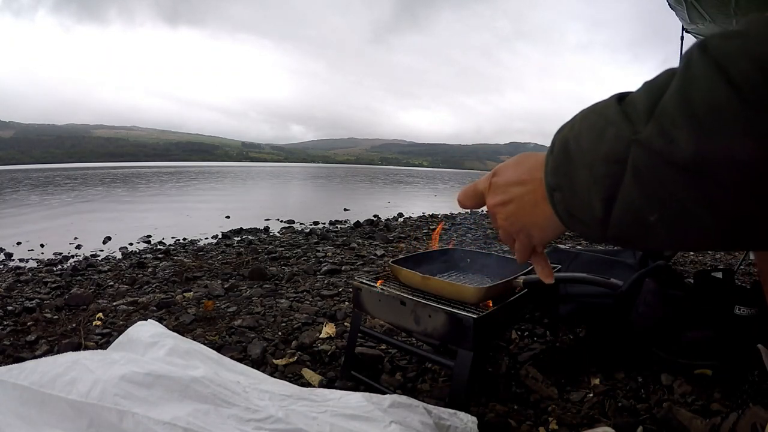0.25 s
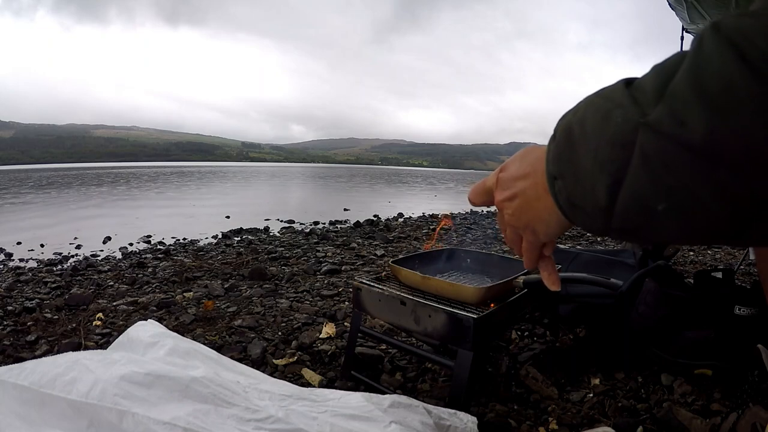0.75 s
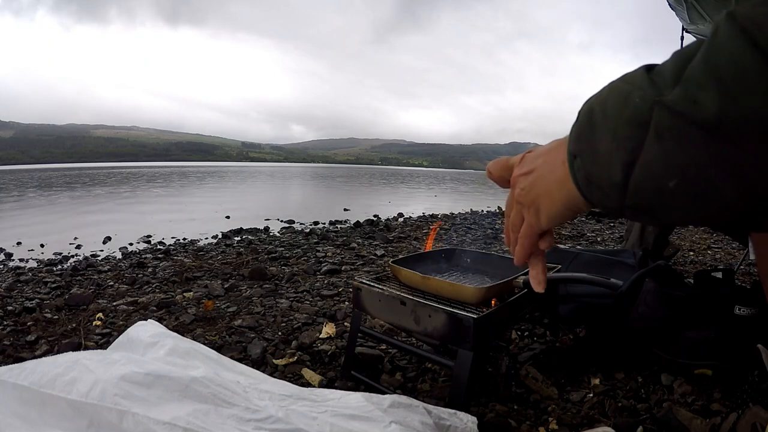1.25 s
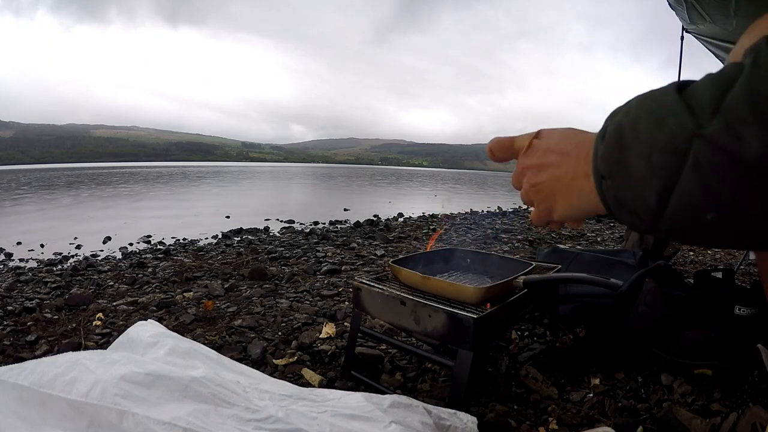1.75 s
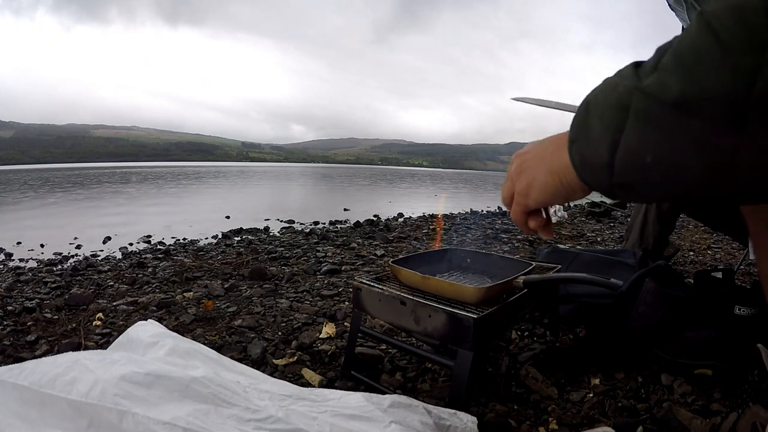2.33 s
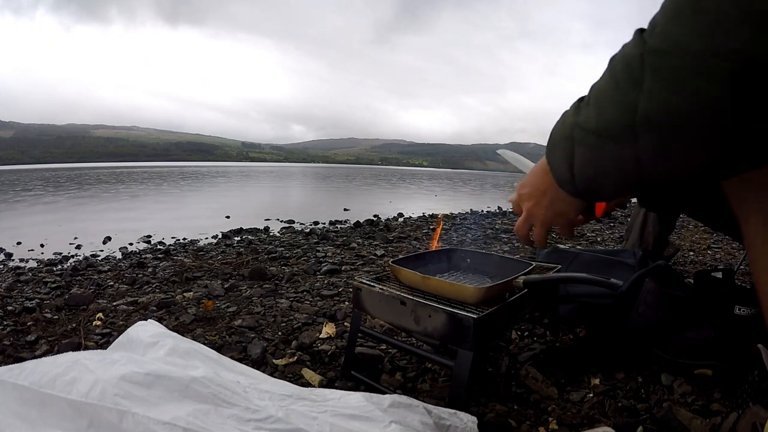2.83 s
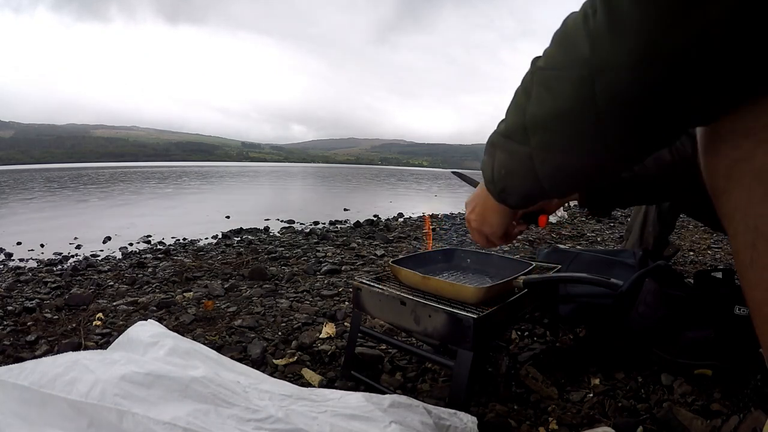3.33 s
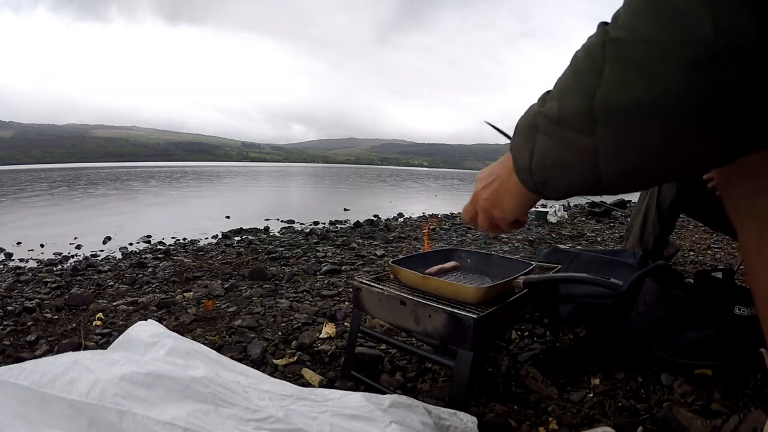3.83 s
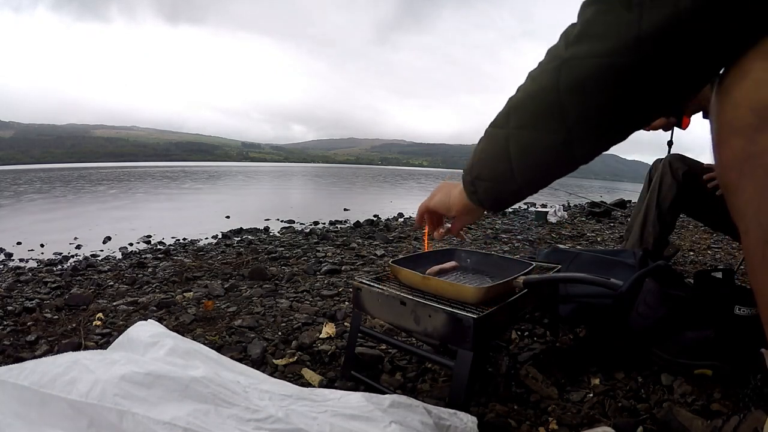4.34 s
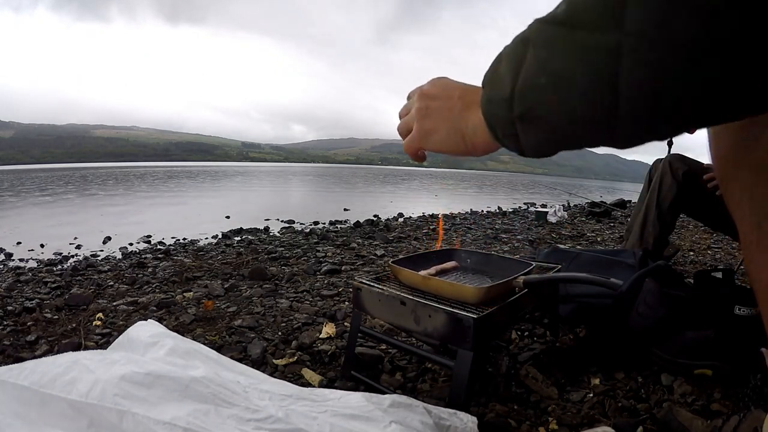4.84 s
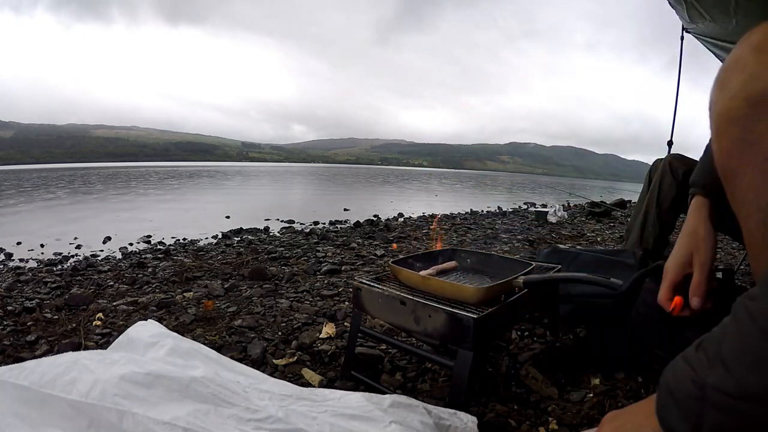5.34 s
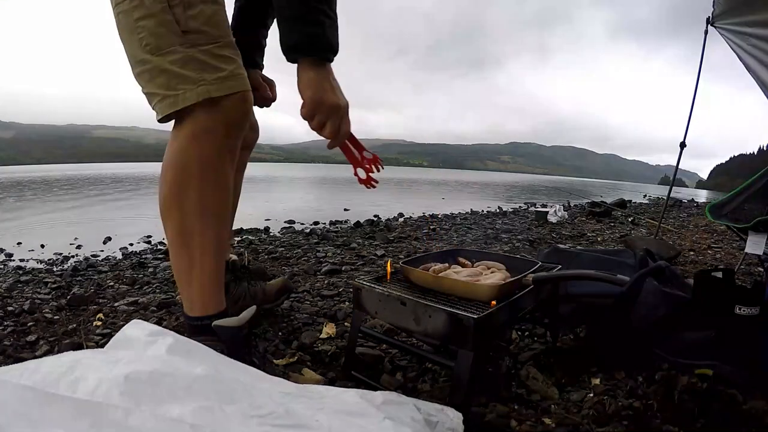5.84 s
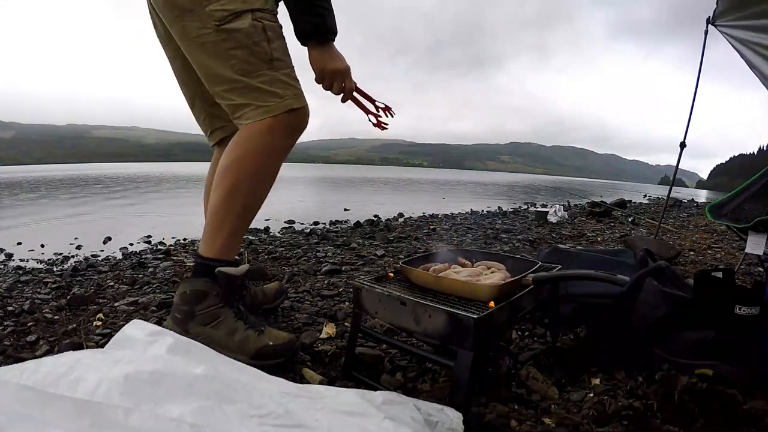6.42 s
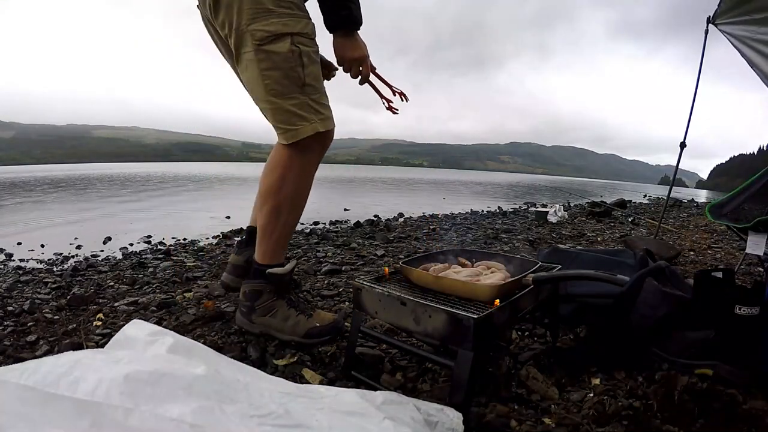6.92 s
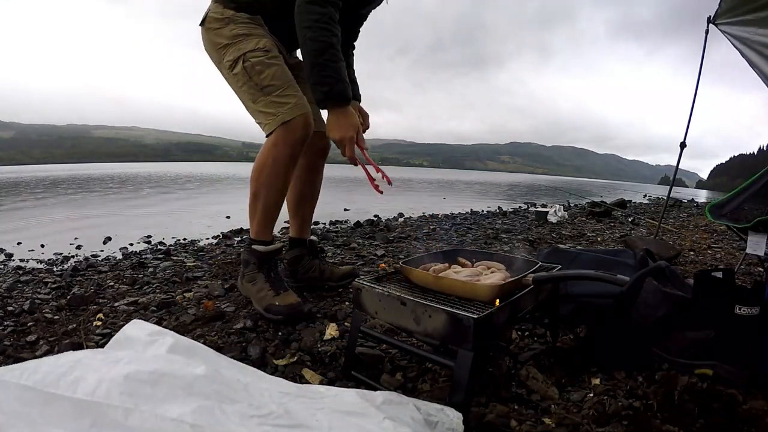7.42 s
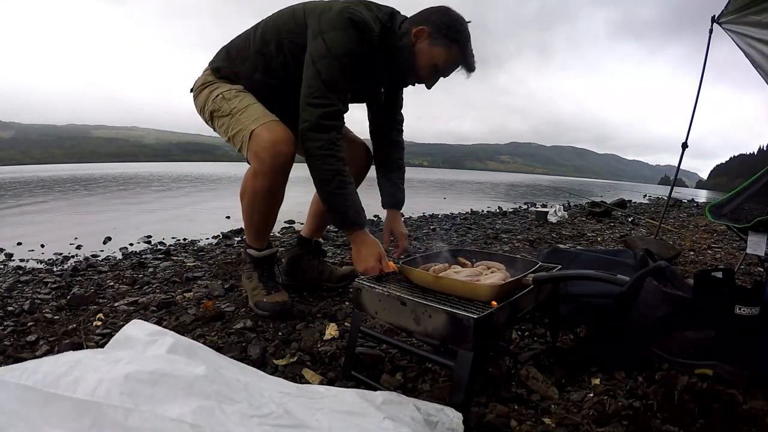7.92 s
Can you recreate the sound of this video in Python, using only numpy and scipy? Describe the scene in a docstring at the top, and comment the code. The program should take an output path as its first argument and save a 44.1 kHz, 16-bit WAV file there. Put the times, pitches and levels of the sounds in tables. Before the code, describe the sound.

Hot fat spits sharp cracks and ringing plops over thin crackle, a metal clank, then a full pan sizzles densely while boots shift on stones.

```python
"""Sausages fry in a pan on a wood-fired stove on a pebbly lake shore: ringing plops and noise cracks.
The nearly empty pan spits in thin crackle, then the full pan sizzles densely; both are shaped random clicks.
Metal clanks (band noise, stove modes); boots on the stones and soft bumps knock (sinking tones, grit).
Soles scuff (lumpy band noise), breeze and flames (coloured noise) rumble below, with a faint low drone
(narrow-band noise)."""
import sys
import numpy as np
from scipy import signal
from scipy.fft import rfft, irfft
from scipy.io import wavfile

SR = 44100
rng = np.random.default_rng(int(sys.argv[2]) if len(sys.argv) > 2 else 0)


def output_pcm(signal):
    """Save a mono or channel-first signal as 16-bit PCM at the path in sys.argv[1].

    Samples are clipped to [-1, 1] before scaling.
    """
    pcm = np.clip(np.atleast_2d(signal).T, -1, 1) * 32767
    wavfile.write(sys.argv[1], SR, np.round(pcm).astype(np.int16))


N = 360297
FULL_PAN_S = 5.62


def pops(bursts, plop_db=-1.0, crack_db=0.7, crack_s=0.00062, spatter_db=-13, spatter_s=0.0055,
         torn_cycles=0.66, whole_cycles=1.5, slap_db=-8, echo_s=0.0026, echo_db=-8):
    """Each burst is the plop of a cavity and the crack of a tearing film, then a spatter of droplets."""
    plops, cracks = np.zeros(N), np.zeros(N)
    t = np.arange(SR // 40) / SR
    for (s, hz, ring_db, tick_db), (delay, detune) in zip(bursts, rng.random((len(bursts), 2))):
        # a cavity that tears open violently hardly rings at all
        cycles = np.interp(tick_db - ring_db, [-8, 6], [whole_cycles, torn_cycles])
        first = plop(t, hz, cycles=cycles, linger_cycles=7 * cycles)
        add(plops, s, from_db(ring_db + plop_db) / np.sqrt(cycles) * first)
        # a fainter, slightly detuned plop follows a moment later
        second = plop(t, hz * (0.73 + 0.56 * detune), cycles=cycles, linger_cycles=5 * cycles)
        add(plops, s + 0.00103 + 0.004 * delay, from_db(ring_db + plop_db + slap_db) * second)

        spatter = from_db(spatter_db) * burst(t, spatter_s)
        crack = from_db(tick_db + crack_db) * (burst(t, crack_s) + spatter)
        add(cracks, s, crack)
        # the pan wall echoes it, sooner or later by its place in the pan
        add(cracks, s + echo_s * (0.5 + delay), from_db(echo_db) * crack)
    return plops + small_source(cracks)


def small_source(cracks, body_db=-3, bass_db=-14):
    """Small sources radiate little bass."""
    full_bodied = cracks + from_db(body_db) * cut(cracks, 10300, "low", order=1)
    bass = from_db(bass_db) * cut(cracks, 700, "low", order=1)
    radiated = cut(full_bodied, 3000, "high", order=1) + bass
    return cut(cut(radiated, 104, "high"), 7600, "low", order=1)


def plop(t, hz, cycles=1.13, rise=0.0061, linger_db=-14, linger_cycles=10):
    """A steam cavity swells, rings on for some cycles and rises in pitch as it opens."""
    turns = hz * t
    age = turns / cycles
    main = age * np.exp(1 - age)
    linger = from_db(linger_db) * (1 - np.exp(-age)) * np.exp(-turns / linger_cycles)
    return (main + linger) * np.sin(2 * np.pi * turns * (1 + rise * np.minimum(age, 6)))


def loud_pops():
    """The loudest bursts in the fat, as rows for pops()."""
    # (time [s], cavity pitch [Hz], relative plop level [dB], relative crack level [dB])
    loud_rows = [(.2435, 3200, -12.5, -9), (.3724, 3000, -14, -11), (.406, 3450, -8.5, -33),
                 (.5417, 3900, -13, -27), (.5714, 4050, -23, -6.5), (.6088, 4500, -21, -6.5),
                 (.651, 7400, -10.5, -3.5), (.7492, 4340, -26, -2), (.813, 1800, -23, -30),
                 (.8978, 3460, -15, -34), (.9541, 3180, -24, -6.5), (1.0652, 3020, -10.5, -15),
                 (1.1784, 3700, 2, 13.5), (1.1935, 4770, -11.5, -2), (1.271, 4100, -21, -5.5),
                 (1.328, 5600, -20, -7), (1.3502, 2290, -10.5, -14.5), (1.5288, 5000, -23, -7),
                 (1.5419, 4170, -13.5, -2), (1.6723, 3860, -19, -9), (1.7276, 3700, -15, -26),
                 (1.8229, 5300, -4, 3.5), (1.9661, 4870, -20.5, -8), (2.0387, 4540, -32, -8.5),
                 (2.1303, 3470, -14, -23), (2.1578, 3230, -10, -10), (2.23, 3120, -16.5, -11.5),
                 (2.2515, 3450, -13, -17), (2.2755, 2680, -18.5, -33), (2.3174, 4500, -20, -3),
                 (2.4306, 5900, -32, -10), (2.4932, 4200, -24, -4), (2.5802, 2900, -17, -34),
                 (2.6541, 5900, -20, -3.5), (2.7244, 2940, -15.5, -34), (2.8564, 3570, -13.5, -19),
                 (2.8677, 4150, -15.5, -1), (2.8817, 3830, -16.5, -27), (2.9478, 2330, -22.5, -7),
                 (3.0548, 3610, 3, 8), (3.1029, 4650, -25, -1.5), (3.2725, 2800, -19.5, -28),
                 (3.3871, 2390, -14, -14.5), (3.4437, 3120, -26, -7), (3.4934, 4260, -4.5, 6),
                 (3.5515, 3610, -18, -7), (3.6677, 6800, -10, 10.5), (3.738, 3780, -18, -10),
                 (3.874, 3830, -16.5, -8.5), (4.0306, 3820, -7, 13), (4.1015, 2850, -11, -17),
                 (4.191, 4250, -18, -2.5), (4.4332, 4640, -28, -4.5), (4.468, 4200, -16.5, -11),
                 (4.5241, 5270, -17, -1), (4.607, 3160, -11, -13), (4.8034, 3340, -10.5, -15),
                 (4.8515, 2700, -13.5, -25), (4.868, 6500, -22, -2.5), (4.8965, 3080, -23, -2.5),
                 (4.9553, 2950, -10.5, 0), (5.1511, 3730, -27, -4), (5.2562, 2190, -16.5, -16),
                 (5.2772, 3450, -8, -16), (5.376, 2050, -8.5, -7), (5.3997, 4330, -15.5, -18),
                 (5.5371, 3330, -20, -29), (5.6193, 4170, -16, -7.5), (5.6422, 3190, -15.5, -25),
                 (5.6897, 3420, -18.5, -27), (5.7829, 2900, -18.5, -6), (5.9887, 2340, -17.5, -29),
                 (6.2985, 3150, -8.5, 1.5), (6.3597, 3320, -19, -24), (6.9657, 3420, -20, -30),
                 (7.2627, 1860, -25, -16), (7.562, 3600, -18, -10), (7.7898, 3770, -18.5, -9),
                 (7.8798, 2580, -19, -26)]
    return list(loud_rows)


def lesser_pops(count=160, per_s=14, smothered_db=-5.5):
    """Lesser bursts, one at a random moment in each 1/per_s; a full pan muffles their cracks."""
    # (mean, spread) of pitch [Hz], relative plop level [dB], relative crack level [dB]
    laws = [(3980, 710), (-23.5, 4), (-15, 4)]
    rows = []
    for k, (when, *chances) in enumerate(rng.random((count, 4))):
        s = (k + when) / per_s
        # uniform draws; the spread is their standard deviation
        hz, plop_db, crack_db = (mean + spread * np.sqrt(12) * (u - 0.5)
                                 for (mean, spread), u in zip(laws, chances))
        rows.append((s, hz, plop_db, crack_db + smothered_db * (s > FULL_PAN_S)))
    return rows


def sizzle(thin_db=-0.5, full_db=0.33, spray_db=4.5, full_spray_db=3.0, bubbles_db=-8):
    """Sparse crackle in the bare fat, a dense fizz once the pan is full, over small plops."""
    # vigour of the frying: (time [s], relative simmer level [dB], relative fine spray level [dB])
    frying = [(0.0, -44.5, -54), (0.25, -50, -54), (0.55, -39, -51), (1.05, -42, -46.5), (1.66, -51, -57.5),
              (2.27, -47.5, -58.5), (2.57, -48, -52.5), (2.73, -36.5, -45.5), (2.93, -40, -50.5),
              (3.25, -46.5, -51), (3.46, -42.5, -65), (3.91, -42, -49), (4.25, -39.5, -52.5),
              (4.66, -39, -50.5), (5.37, -41.5, -52.5), (5.73, -39, -48), (7.17, -40, -51.5),
              (8.17, -39, -47.5)]
    # spectrum in the bare fat: (frequency [Hz], relative level [dB])
    thin_spectrum = [(250, -21), (450, -9), (850, -9), (1400, -8.5), (2200, -2), (3000, 0), (3800, 2),
                     (5700, -3), (9000, -7.5), (14500, -12), (16000, -17)]
    # spectrum in the full pan: (frequency [Hz], relative level [dB])
    full_spectrum = [(250, -12.5), (450, -8.5), (1100, -6.5), (1500, -6.5), (2000, -3.5), (2600, -3.5),
                     (3200, 2.5), (4200, -0.5), (5400, 1), (8000, -6), (10000, -10.5), (14800, -14),
                     (16000, -30)]

    simmer, spray = in_time(frying)
    full = np.clip((np.arange(N) / SR - FULL_PAN_S) * 100, 0, 1)
    crackle = around_pan(fizzing(1100, 6.83, 5, snap_db=2.0))
    thin = coloured(crackle + 0.24 * rng.standard_normal(N), thin_spectrum)
    fizz = fizzing(7000, 5.36, 3.0, snap_db=-0.5)
    dense = coloured(fizz + 0.6 * rng.standard_normal(N), full_spectrum)

    bubbles = around_pan(small_plops(count=600, low_hz=2800, high_hz=6560, spread_db=40))
    out = from_db(simmer + bubbles_db - 4.5 * full) * bubbles
    layers = [(thin, 1 - full, thin_db, spray_db), (dense, full, full_db, full_spray_db)]
    for sound, share, low_db, high_db in layers:
        out += share * from_db(simmer + low_db) * rms_one(cut(sound, 6180, "low", order=3))
        out += share * from_db(spray + high_db) * rms_one(cut(sound, 7040, "high", order=3))
    return out


def fizzing(per_s, spread_db, clump_db, snap_db, count=12):
    """Tiny bursts of uneven size come in clumps; each snaps and rings briefly in one of the bands."""
    born = rng.random(N) < per_s * from_db(clump_db * drift(70)) / SR
    sizes = from_db(spread_db * np.minimum(rng.exponential(1, N), 4))
    clicks = born * rng.choice([-1, 1], N) * sizes
    edges_hz = np.geomspace(700, 15000, count + 1)
    dealt = rng.integers(0, count, N)
    rings = sum(cut(clicks * (dealt == k), [edges_hz[k] / 1.053, edges_hz[k + 1] * 1.09], "band")
                for k in range(count))
    return rms_one(rms_one(rings) + from_db(snap_db) * rms_one(clicks))


def small_plops(count, low_hz, high_hz, spread_db):
    """Lesser bubbles burst at random times and pitches."""
    out, t = np.zeros(N), np.arange(SR // 60) / SR
    for when, pitch, size in rng.random((count, 3)):
        hz = low_hz * (high_hz / low_hz) ** pitch
        add(out, when * N / SR, from_db(spread_db * size ** 2) * plop(t, hz, cycles=2.4))
    return rms_one(out)


def around_pan(x, scatter_db=-7, scatter_s=0.0031, shore_db=-16, shore_s=0.014, ring_db=-53):
    """Stove and stones scatter the sound, and the metal rings faintly."""
    # resonances of the pan: (frequency [Hz], relative level [dB], t60 [s])
    pan_modes = [(1013, 14, 0.019), (1890, 0, 0.046), (2273, 0.5, 0.17), (2325, -10, 0.073), (2450, 4, .06),
                 (2910, 9, 0.061), (3340, -26, .045), (3910, 7, 0.038), (4860, 6, 0.042), (6600, 1, 0.043)]
    t = np.arange(SR // 6) / SR
    scatter = from_db(scatter_db) * burst(t, scatter_s) + from_db(shore_db) * burst(t, shore_s)
    response = cut(scatter * (1 - np.exp(-t / 0.00037)), 17400, "low", order=1)
    response += from_db(ring_db) * ringing(pan_modes, t)
    response[0] += 1  # direct sound
    return signal.fftconvolve(x, response)[:N]


def clanks(width=1.28, edge_db=-10, rattle_db=-2):
    """Metal rattles against metal as band noise, and each blow drives the stove's modes."""
    # (time [s], relative level [dB], pitch [Hz], rattle decay to 1/e [s], relative stove ring level [dB])
    knocks = [(3.4941, 4, 3900, 0.027, -48), (3.4937, -2, 1520, 0.0029, -55),
              (7.262, -21, 1100, 0.0016, -60), (7.74, -16.5, 790, 0.0089, -53),
              (8.095, -6.5, 1090, 0.028, -26.5)]
    # modes of the stove: (frequency [Hz], relative level [dB], t60 [s])
    stove_modes = [(403, -37, 0.23), (610, -13.5, 0.14), (1082, -11, 0.086), (1230, -8.5, 0.12),
                   (1296, -19, 0.19), (1653, -23, 0.086)]
    out, t = np.zeros(N), np.arange(SR // 5) / SR
    for s, db, hz, decay_s, ring_db in knocks:
        rattle = burst(t, decay_s)
        edge = from_db(edge_db) * cut(rattle, [hz / 3, hz * 2], "band", order=1)
        clank = cut(rattle, [hz / width, hz * width], "band") + edge
        add(out, s, from_db(db + 7.5) * clank / np.linalg.norm(clank))
        contact = from_db(rattle_db) * rattle + (t == 0)
        ring = signal.fftconvolve(contact, ringing(stove_modes, t))[:len(t)]
        add(out, s, from_db(ring_db) * ring)
    return out


def thuds(knock_db=-2, grit_db=9, knock_s=0.0034, grit_s=0.0091, fall_s=0.0116, push_db=-16, push_hz=70):
    """Boots on the stones and soft bumps: a knock that sinks in pitch, short grit and a low push."""
    # (time [s], relative level [dB], nominal pitch [Hz]); the knock starts at 1.55 times the pitch
    bumps = [(4.664, -33, 150), (5.668, -36, 670), (5.909, -38.5, 357), (6.036, -35, 315),
             (6.704, -32, 140), (6.71, -30.5, 254), (6.759, -31, 336), (6.908, -27, 263), (7.162, -35, 330),
             (7.364, -29.5, 150), (7.428, -27, 268), (7.467, -35.5, 161), (7.532, -29, 147),
             (7.557, -32, 645), (7.566, -28.5, 148), (7.589, -32, 304)]
    out, t = np.zeros(N), np.arange(SR // 10) / SR
    for s, db, hz in bumps:
        turns = 1.55 * hz * fall_s * (1 - np.exp(-t / fall_s))
        knock = t / knock_s * np.exp(1 - t / knock_s) * np.sin(2 * np.pi * turns)
        grit = 10 * cut(burst(t, grit_s), [130, 700], "band")
        push = np.exp(-t / 0.017) * np.sin(2 * np.pi * push_hz * t)
        thud = from_db(knock_db) * knock + from_db(grit_db) * grit + from_db(push_db) * push
        add(out, s, from_db(db) * thud)
    return out


def scuffs(lumpy_db=4):
    """A dragged sole rolls the stones: a dull, lumpy rumble that swells and fades."""
    # (time [s], level [dB], length [s])
    drags = [(5.93, -51.5, 0.12), (6.713, -46, 0.11), (7.46, -54, 0.071), (7.575, -44, 0.08)]
    rumble = from_db(lumpy_db * drift(120)) * cut(rng.standard_normal(N), [90, 620], "band")
    return swells(drags) * rms_one(rumble)


def air(calm_db=-58, flames_db=-57.5):
    """Gusts of breeze and steady flames rumble under everything, as coloured noise."""
    # (time [s], relative level [dB], length [s])
    gusts = [(2.72, -50, 0.19), (3.9, -44.5, 1.2), (4.32, -36.5, 0.15), (4.93, -38, 0.32),
             (5.36, -43, 0.34), (7.56, -42.5, .16)]
    # spectrum of the breeze: (frequency [Hz], relative level [dB])
    wind_spectrum = [(12, -37), (20, 6.5), (39, 0.5), (86, -15), (155, -25.5), (216, -31.5), (300, -23),
                     (390, -48), (660, -120)]
    # spectrum of the flames: (frequency [Hz], relative level [dB])
    fire_spectrum = [(35, -26.5), (60, -1.5), (138, -2.5), (199, -9.5), (390, -16.5), (775, -15.5),
                     (1260, -14), (1380, -15.5), (1500, -26), (1950, -40), (3300, -120)]
    wind = coloured(cut(rng.standard_normal(N), 17.0, "high"), wind_spectrum)
    wind *= (from_db(calm_db) + swells(gusts)) * from_db(2.5 * drift(12))
    fire = coloured(cut(rng.standard_normal(N), 3100, "low"), fire_spectrum)
    fire *= from_db(flames_db + 0.42 * drift(31))
    return cut(wind, 187, "low") + fire


def drone(hz=160, width_hz=22, peak_s=3.32, peak_db=-60.5, rise_db_per_s=5.5, fall_db_per_s=3.5):
    """A narrow, wavering band of low noise that slowly swells and fades."""
    t = np.arange(N) / SR - peak_s
    level_db = peak_db + np.minimum(rise_db_per_s * t, -fall_db_per_s * t)
    band = cut(rng.standard_normal(N), [hz - width_hz / 2, hz + width_hz / 2], "band")
    return from_db(level_db) * rms_one(band)


def burst(t, decay_s):
    """A dying puff of noise of unit energy."""
    puff = rng.standard_normal(len(t)) * np.exp(-t / decay_s)
    return puff / np.linalg.norm(puff)


def ringing(modes, t):
    """Free decay of a set of modes."""
    return sum(from_db(db - 60 * t / t60) * np.sin(2 * np.pi * hz * t) for hz, db, t60 in modes)


def swells(rows):
    """Summed gain of bell-shaped swells (time [s], level [dB], length between 1/e points [s])."""
    t = np.arange(N) / SR
    return sum(from_db(db) * np.exp(-(2 * (t - s) / length) ** 2) for s, db, length in rows)


def drift(rate_hz):
    """Random curve of unit rms through rate_hz knots per second."""
    knots = rng.standard_normal(N // 20)
    return rms_one(np.interp(np.arange(N) * rate_hz / SR, np.arange(len(knots)), knots))


def coloured(x, spectrum):
    """Minimum-phase filter that follows a spectrum; unit rms."""
    size = 16384
    hz, db = np.transpose(spectrum)
    log_hz = np.log(np.fft.rfftfreq(size, 1 / SR) + 1)
    log_gain = np.log(from_db(np.interp(log_hz, np.log(hz), db)))
    # folding the cepstrum makes the filter causal
    cepstrum = irfft(log_gain)[:size // 2]
    cepstrum[1:] *= 2
    response = irfft(np.exp(rfft(cepstrum, size)))
    return rms_one(signal.fftconvolve(x, response)[:N])


def cut(x, hz, kind, order=2):
    """Butterworth filter."""
    sos = signal.butter(order, np.clip(hz, 10, 0.45 * SR), kind, fs=SR, output="sos")
    return signal.sosfilt(sos, x + 1e-18)


def in_time(rows):
    """Each column of a curve at every sample."""
    s, *columns = np.transpose(rows)
    return [np.interp(np.arange(N) / SR, s, c) for c in columns]


def add(out, s, sound):
    """Mix a sound in at a time [s]."""
    i = int(np.clip(round(s * SR), 0, N))
    out[i:i + len(sound)] += sound[:N - i]


def from_db(db):
    """Decibels to gain."""
    return 10 ** (np.asarray(db) / 20)


def rms_one(x):
    """Scale to unit rms."""
    return x / np.sqrt(np.mean(x ** 2) + 1e-20)


def scene():
    """Pan, cook and shore at one microphone."""
    spitting = around_pan(pops(loud_pops() + lesser_pops()))
    return (spitting + sizzle() + clanks() + thuds() + scuffs() + air() + drone())[None]


def record(dry, lopsided=0.13, cutoff_hz=15450):
    """The loudest cracks overload, more on one side, which gives them a low thump; the top is cut."""
    squeezed = np.tanh(dry)
    thump = cut(cut(squeezed ** 2, 116, "high"), 1500, "low", order=1)
    sos = signal.ellip(12, 0.1, 80, cutoff_hz, fs=SR, output="sos")
    return signal.sosfilt(sos, squeezed + lopsided * thump)


dry = scene()
out = record(dry)
output_pcm(out)
```